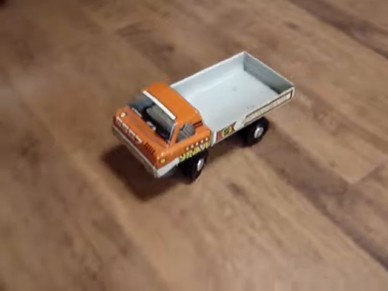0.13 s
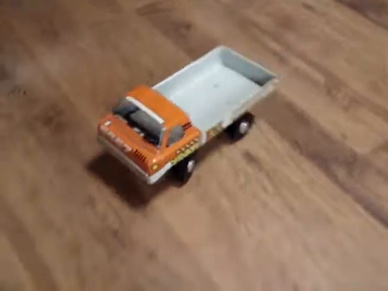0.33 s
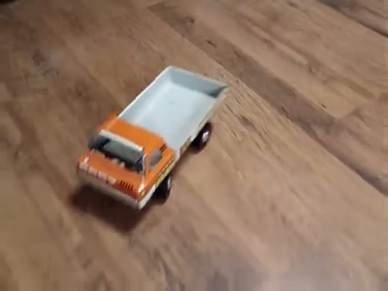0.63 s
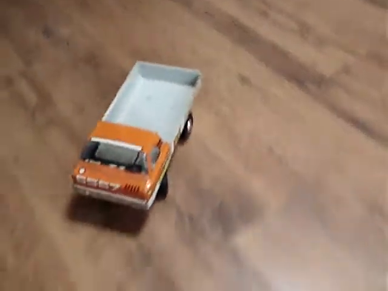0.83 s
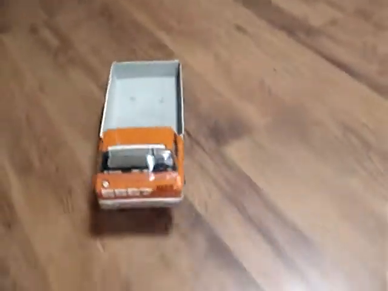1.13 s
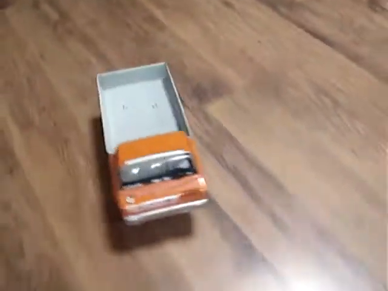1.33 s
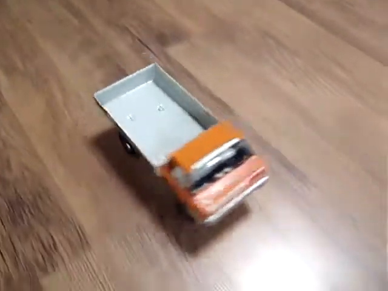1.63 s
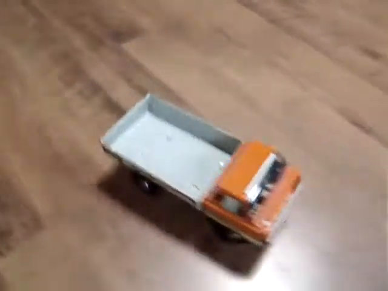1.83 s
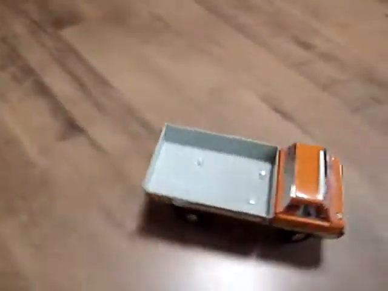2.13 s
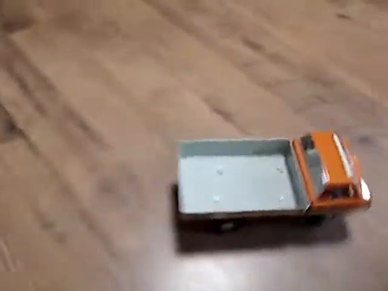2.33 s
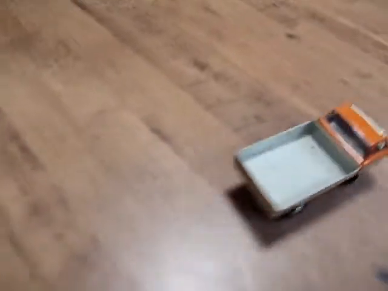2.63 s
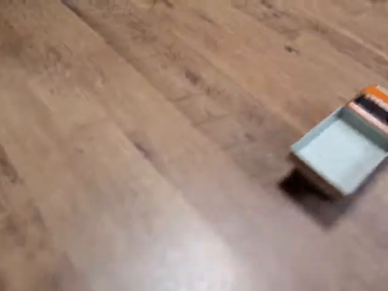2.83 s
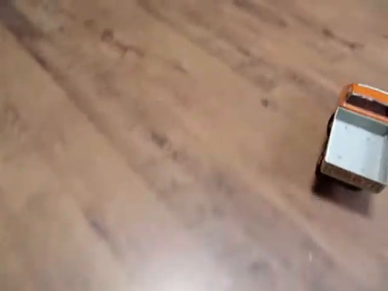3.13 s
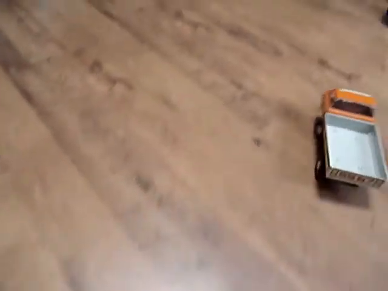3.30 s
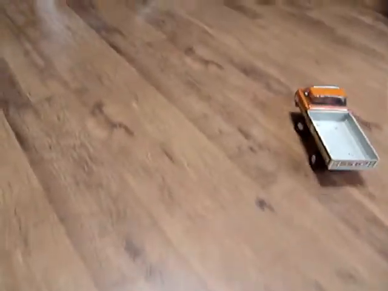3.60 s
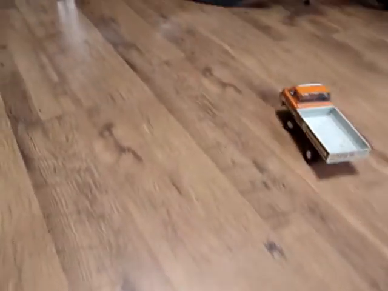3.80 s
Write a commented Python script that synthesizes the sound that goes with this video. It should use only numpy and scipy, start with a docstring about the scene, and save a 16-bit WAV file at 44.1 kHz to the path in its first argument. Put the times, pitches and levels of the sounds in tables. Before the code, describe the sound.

A wind-up tin toy truck starts abruptly and runs across a wooden floor with a steady, rattling clockwork whirr. Fine gear ticks and brief metal clatters come through as it goes, heard close in a small room.

```python
"""A wind-up tin truck drives in a curve over a wooden floor, close by in a small room.
Its clockwork chatters: knocks in the chassis, rattling sheet-metal panels, fine gear ticks and
thin spring zings, all throbbing with each turn of a shaft. The tin body rings and the wheels
rumble faintly. Now and then the gears catch or the cargo bed clatters."""
import sys
import numpy as np
from scipy import signal
from scipy.io import wavfile
from scipy.ndimage import uniform_filter1d, minimum_filter1d

SR = 44100
rng = np.random.default_rng(int(sys.argv[2]) if len(sys.argv) > 2 else 0)


def wrap_up_sound(samples):
    """Save the sound to the file named by the first command line argument, as 16-bit audio."""
    columns = np.atleast_2d(samples).T
    # keep every value between -1 and 1, then stretch to whole-number steps
    tamed = np.clip(columns, -1, 1)
    steps = np.round(tamed * 32767).astype(np.int16)
    wavfile.write(sys.argv[1], SR, steps)


N = 174636
TIME_S = np.arange(N) / SR


def amp(db):
    """Decibels to gain."""
    return 10 ** (np.asarray(db) / 20)


def unit_rms(x):
    """Scales to rms 1."""
    return x / np.sqrt(np.mean(x ** 2) + 1e-20)


def steady(x, samples=13000):
    """Holds the slow level at rms 1."""
    return x / np.sqrt(uniform_filter1d(x ** 2, samples) + 1e-6)


def curve(points):
    """Joins (s, value) points by straight lines."""
    return np.interp(TIME_S, *np.transpose(points))


def at_hz(points, hz):
    """Reads (Hz, value) points on a log-frequency axis."""
    point_hz, value = np.transpose(points)
    return np.interp(np.log(hz + 1), np.log(point_hz), value)


def bumps(rows):
    """Sum of Gaussian rises or dips."""
    return sum(height * np.exp(-((TIME_S - at_s) / half_s) ** 2) for at_s, half_s, height in rows)


def clumps(samples):
    """Random swells of rms 1, smoothed over the given length."""
    return unit_rms(uniform_filter1d(uniform_filter1d(rng.standard_normal(N), samples), samples // 2))


def colour(x, spectrum, size=4096):
    """Minimum-phase filter with the given (Hz, dB) spectrum."""
    log_gain = np.log(amp(at_hz(spectrum, abs(np.fft.fftfreq(size, 1 / SR)))))
    taps = np.fft.ifft(np.exp(np.conj(signal.hilbert(log_gain)))).real
    return signal.oaconvolve(x, taps[:size // 2])[:N]


def impacts(per_s, jitter, spread_db, scrape_db, count=12000):
    """Loosely spaced clicks of uneven size over scraping noise."""
    slip, size, side = rng.standard_normal((count, 3)).T
    at = np.round((np.arange(count) + jitter * slip) * SR / per_s).astype(int)
    heights = np.sign(side) * amp(spread_db * np.clip(size, -2, 2))
    inside = (at >= 0) & (at < N)
    clicks = np.bincount(at[inside], heights[inside], N)
    return unit_rms(clicks) + amp(scrape_db) * rng.standard_normal(N)


# Background spectrum. Each row: frequency in Hz, relative level in dB.
ROOM_TONE_DB = [(20, 5.5), (60, -1), (150, 5), (500, -21.5), (2000, -24), (10000, -29)]

def room_tone(level_db=-79.5):
    """The quiet room rumbles faintly throughout."""
    return amp(level_db) * unit_rms(colour(rng.standard_normal(N), ROOM_TONE_DB))


# Shaft drift about steady rotation. Each row: time in seconds, lead in turns.
SHAFT_LEAD_TURNS = [(0, 0.6), (.6, 0.68), (1.2, 0.4), (1.65, 0.64), (2.0, 0.35), (2.6, 0.57), (3.2, 0.3),
                    (3.65, .55), (3.96, 0.83)]
# Gear catches. Each row: centre in seconds, half length in seconds, dip in dB at catch_share 1.
CATCHES = [(.299, 0.0065, -23), (.44, 0.016, -4.5), (.748, 0.013, -3.5), (1.042, .018, -3),
           (1.405, 0.026, -4), (1.66, .012, -5.5), (2.175, 0.02, -2), (2.232, 0.02, -8),
           (3.03, 0.0079, -7.5), (3.625, 0.024, -9)]

def drive(throb_db, catch_share, shaft_hz=13.5, start_s=0.078, attack_s=0.0026):
    """Force of the clockwork: a quick start, a swell on each shaft turn, and brief catches."""
    onset = np.clip((TIME_S - start_s) / attack_s, 0, 1)
    turn = np.cos(2 * np.pi * (shaft_hz * TIME_S + curve(SHAFT_LEAD_TURNS)))
    return onset * amp(throb_db * turn + catch_share * bumps(CATCHES))


# Body resonances. Each row: frequency in Hz, width in Hz, strength in dB of the ring added to the dry sound (0
# dB lifts the peak by 6 dB), time of its strongest swell in seconds, spread in seconds.
TIN_MODES = [(390, 23, 2, 1.05, 0.12), (452, 44, 2, 2.52, 0.26), (520, 70, 1, 1.06, 0.056),
             (521, 57, 5, 0.23, 0.23), (618, 28, -1, 2.43, 0.87), (696, 47, 13, 2.5, 0.055),
             (776, 57, -1.5, 1, 2.2), (833, 32, 2, 2.38, .25), (842, 14, 8, 2.72, 0.23),
             (1273, 62, -4.5, 1.4, 0.54), (1556, 32, 2, 1.3, 0.77), (1735, 20, 8, 0.99, 0.059),
             (1724, 37, -2, 2.7, 1.4), (2240, 430, -9, 0.61, 0.33), (2490, 88, -3, 3.8, .14),
             (2560, 18, -7, 0.74, .9), (3420, 24, -11, 1.9, 0.54), (3834, 33, -4.5, 1.2, 1.8)]

def tin_body(x):
    """The body adds its ringing, each resonance swelling as its side turns to the microphone."""
    ringing = np.zeros(N)
    for hz, width_hz, db, peak_s, spread_s in TIN_MODES:
        facing = np.exp(-0.5 * ((TIME_S - peak_s) / spread_s) ** 2)
        ringing += amp(db) * facing * signal.lfilter(*signal.iirpeak(hz, hz / width_hz, SR), x)
    return x + ringing


# Room decay. Each row: frequency in Hz, time to fall 60 dB in seconds.
ROOM_T60_S = [(200, 0.32), (1000, 0.24), (4000, 0.24), (10000, 0.043)]

def reflections(x, wet_db, places=7):
    """Adds room reflections that change as the truck moves from place to place."""
    position = np.linspace(0, places - 1, N)
    wet = np.zeros(N)
    for place in range(places):
        hz, age_s, noise = signal.stft(rng.standard_normal(SR // 2), SR, nperseg=256)
        decay = amp(-60 * age_s / at_hz(ROOM_T60_S, hz)[:, None])
        tail = signal.istft(noise * decay, SR)[1]
        nearness = np.cos(np.pi / 2 * np.clip(position - place, -1, 1))
        wet += signal.oaconvolve(x * nearness, tail / np.linalg.norm(tail))[:N]
    return (x + amp(wet_db) * wet) / np.hypot(1, amp(wet_db))


# Spectrum of one knock. Each row: frequency in Hz, relative level in dB.
KNOCK_SPECTRUM_DB = [(60, -47.5), (130, -43.5), (210, -32.5), (270, -18.5), (330, -9.5), (400, -2.5),
                     (510, 0), (660, -4), (820, -7.5), (1000, -13), (1500, -16.5), (4000, -58)]
# Knocking as the truck turns and moves away. Each row: time in seconds, relative level in dB.
CHASSIS_LEVEL_DB = [(0.1, -21), (0.24, -20), (0.28, -20.5), (0.37, -19.5), (0.38, -15.5), (0.43, -19),
                    (0.9, -20.5), (1.0, -19.5), (1.07, -19), (1.15, -22.5), (1.33, -19.5), (1.41, -23.5),
                    (1.42, -19.5), (1.55, -19.5), (1.58, -22), (1.77, -19.5), (1.8, -26.5), (1.88, -18.5),
                    (1.9, -22), (2.33, -21), (2.6, -22), (2.63, -18), (2.67, -26), (2.72, -22.5),
                    (3.25, -23), (3.36, -21), (3.37, -24.5), (3.95, -24.5)]

def chassis():
    """The escapement and wheels knock the hollow chassis."""
    knocks = impacts(per_s=210, jitter=0.3093, spread_db=2.5, scrape_db=-4)
    knocks *= drive(throb_db=0.47, catch_share=0.14)
    ringing = steady(tin_body(colour(knocks, KNOCK_SPECTRUM_DB)))
    return reflections(ringing * amp(curve(CHASSIS_LEVEL_DB)), wet_db=-12)


# Spectrum of one panel tap. Each row: frequency in Hz, relative level in dB.
PANEL_SPECTRUM_DB = [(120, -70.5), (250, -29), (600, -11), (950, 2), (1100, 0.5), (1300, 0.5), (2000, 1),
                     (2550, 1.5), (2900, -7.5), (3800, -11), (5000, -20), (10000, -54.5)]
# Rattle along the path. Each row: time in seconds, relative level in dB.
PANEL_LEVEL_DB = [(.1, -21.5), (.25, -23), (.32, -22.5), (.4, -24), (.48, -21.5), (.63, -21.5),
                  (.72, -24.5), (.79, -20.5), (.88, -20.5), (1.03, -25), (1.11, -22.5), (1.22, -23.5),
                  (1.35, -24.5), (1.55, -23.5), (1.85, -22.5), (2.08, -22.5), (2.2, -25), (2.28, -21),
                  (2.58, -24.5), (2.69, -24), (2.8, -22), (3.0, -22.5), (3.22, -23), (3.38, -21.5),
                  (3.47, -25), (3.6, -23.5), (3.72, -22.5), (3.95, -25)]

def panels():
    """Loose sheet-metal panels rattle against each other in clumps."""
    taps = impacts(per_s=520, jitter=0.45, spread_db=1.5, scrape_db=-6)
    taps *= drive(throb_db=0.74, catch_share=0.48) * amp(0.97 * clumps(samples=400))
    ringing = unit_rms(tin_body(colour(taps, PANEL_SPECTRUM_DB)))
    return reflections(ringing * amp(curve(PANEL_LEVEL_DB)), wet_db=-9)


# Spectrum of one tick. Each row: frequency in Hz, relative level in dB.
GEAR_SPECTRUM_DB = [(120, -58), (500, -28), (2000, 0), (3100, 4.5), (3900, 4), (4400, 0.5), (5000, -5.5),
                    (5800, -5), (6800, -4.5), (8200, -9.5), (9300, -33), (10100, -37.5)]
# Gears and spring along the path. Each row: time in seconds, relative level in dB.
GEAR_LEVEL_DB = [(0.1, -27), (0.22, -29.5), (0.26, -25), (0.3, -39), (0.31, -24.5), (0.39, -27.5),
                 (1.59, -31), (2.06, -27.5), (2.18, -32), (2.21, -26.5), (2.23, -32.5), (2.25, -29),
                 (2.63, -29.5), (3.24, -29.5), (3.6, -31.5), (3.65, -29), (3.95, -29)]

def gears():
    """Gear teeth tick and scrape."""
    ticks = impacts(per_s=1400, jitter=0.45, spread_db=3, scrape_db=1)
    ticks *= drive(throb_db=0.24, catch_share=0.5) * amp(1.9 * clumps(samples=220))
    ringing = unit_rms(tin_body(colour(ticks, GEAR_SPECTRUM_DB)))
    return reflections(ringing * amp(curve(GEAR_LEVEL_DB)), wet_db=-16)


# Metallic zings. Each row: centre in Hz, width in Hz, relative level in dB.
SPRING_BANDS = [(3840, 330, -43), (5700, 930, -43), (8160, 1400, -39.5), (9200, 770, -41.5)]

def spring(clump_db=5, clump_samples=190):
    """The coils of the unwinding spring slip over each other in brief zings."""
    slips = amp(clump_db * np.clip(clumps(clump_samples), -2, 1.5))
    zings = np.zeros(N)
    for hz, width_hz, db in SPRING_BANDS:
        band = signal.butter(2, [hz - width_hz / 2, hz + width_hz / 2], "band", fs=SR, output="sos")
        friction = rng.standard_normal(N) * slips * amp(1.8 * clumps(clump_samples))
        zings += amp(db) * unit_rms(signal.sosfilt(band, friction))
    return zings * drive(throb_db=1, catch_share=1) * unit_rms(amp(curve(GEAR_LEVEL_DB)))


# Rolling spectrum. Each row: frequency in Hz, relative level in dB.
ROLL_SPECTRUM_DB = [(20, -5), (50, -8.5), (100, -4.5), (160, -3.5), (200, 2.5), (260, -9), (500, -24.5),
                    (2000, -49)]
# Rolling along the path. Each row: time in seconds, relative level in dB.
ROLL_LEVEL_DB = [(0.1, -57.5), (1.15, -58.5), (1.77, -57.5), (1.805, -53), (1.85, -53.5), (2.47, -61),
                 (3.95, -61.5)]

def wheels():
    """The wheels roll over the wooden boards with a faint rumble."""
    rumble = unit_rms(colour(rng.standard_normal(N), ROLL_SPECTRUM_DB))
    return rumble * amp(curve(ROLL_LEVEL_DB)) * drive(throb_db=0.5, catch_share=0.1)


# Spectrum of one cargo bed strike. Each row: frequency in Hz, relative level in dB.
BED_SPECTRUM_DB = [(120, -55), (300, -33.5), (800, -4), (1250, 3.5), (1700, 5), (2100, -1.5), (2550, 0.5),
                   (3200, -11), (4200, -15.5), (6000, -20), (10000, -28.5)]
# Bed clatters. Each row: centre in seconds, half length in seconds, relative level in dB.
CLATTERS = [(.112, 0.0081, -15), (0.389, 0.0044, -21), (0.79, 0.0057, -19), (1.093, .016, -18),
            (1.134, 0.018, -24), (1.33, 0.021, -19), (1.369, 0.015, -18), (1.499, 0.0066, -19.5),
            (1.614, 0.014, -16), (1.692, .016, -19.5), (1.823, 0.038, -18), (1.913, 0.0075, -15.5),
            (2.059, 0.018, -20), (2.095, .007, -17), (2.453, 0.0068, -21), (2.681, 0.012, -15),
            (2.785, 0.0047, -19), (2.975, 0.0077, -21), (3.01, .007, -19), (3.083, 0.013, -14.5),
            (3.503, 0.012, -19), (3.905, 0.0068, -15)]

def cargo_bed(strike_db=22):
    """The cargo bed buzzes on its mounts in short bursts, each around one hard strike."""
    strikes = np.bincount([round(at_s * SR) for at_s, _, _ in CLATTERS], minlength=N)
    buzz = impacts(per_s=420, jitter=0.25, spread_db=1.5, scrape_db=-3)
    bursts = bumps([(at_s, half_s, amp(db)) for at_s, half_s, db in CLATTERS])
    clatter = colour((buzz + amp(strike_db) * strikes) * bursts, BED_SPECTRUM_DB)
    filter_gain = np.std(colour(rng.standard_normal(N), BED_SPECTRUM_DB))
    return reflections(tin_body(clatter) / filter_gain, wet_db=-9)


def scene():
    """The truck over the room tone, in mono."""
    background = room_tone()
    bodywork = amp(0.2) * chassis() + amp(2) * panels() + amp(-4) * cargo_bed()
    running_gear = amp(0.26) * gears() + spring() + amp(2) * wheels()
    return (background + bodywork + running_gear)[None]


def record(dry, ceiling=0.63, window_samples=60, cutoff_hz=10200):
    """A fast limiter holds the loudest peaks; a low-pass follows."""
    gain = np.minimum(1, ceiling / (abs(dry) + 1e-9))
    gain = uniform_filter1d(minimum_filter1d(gain, window_samples), window_samples)
    lowpass = signal.firwin(511, cutoff_hz, window=("kaiser", 9), fs=SR)
    return signal.oaconvolve(dry * gain, lowpass[None], "same")


dry = scene()
out = record(dry)
wrap_up_sound(out)
```